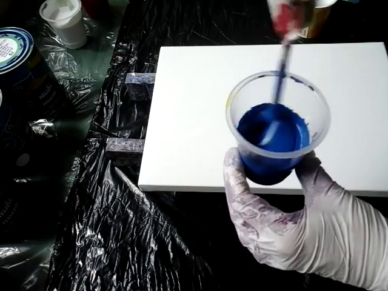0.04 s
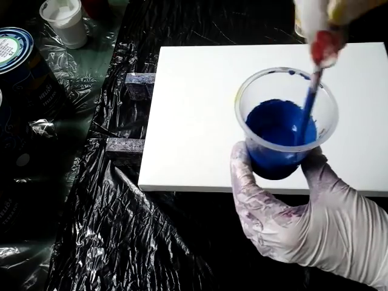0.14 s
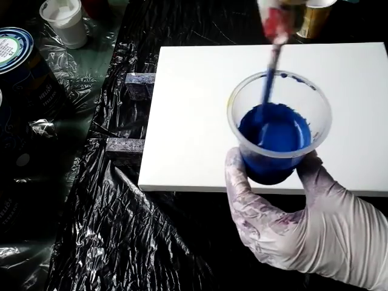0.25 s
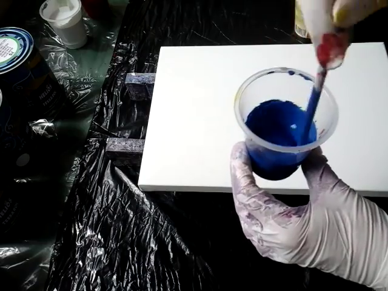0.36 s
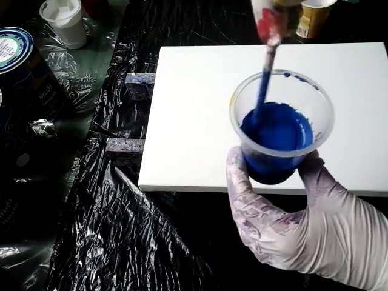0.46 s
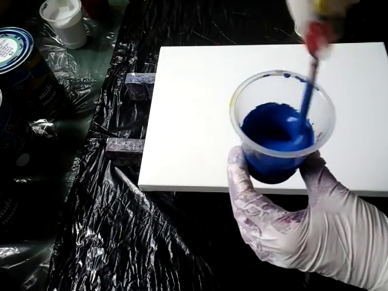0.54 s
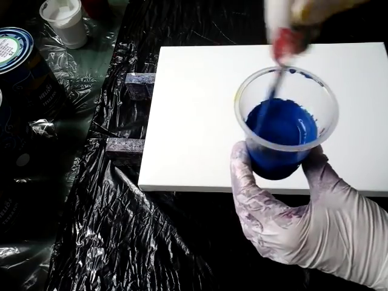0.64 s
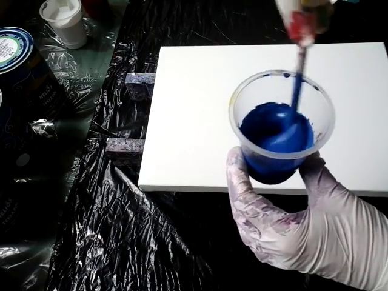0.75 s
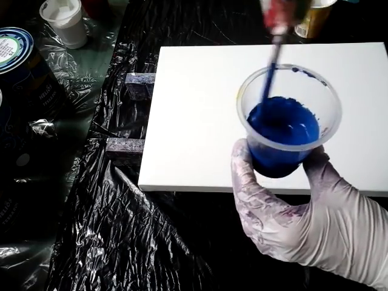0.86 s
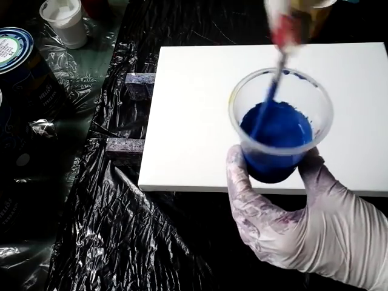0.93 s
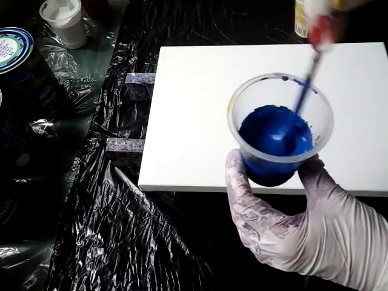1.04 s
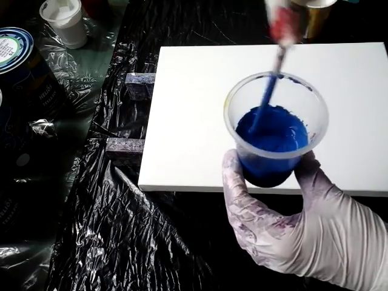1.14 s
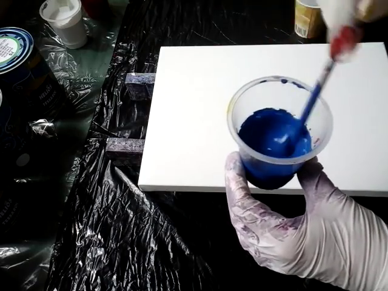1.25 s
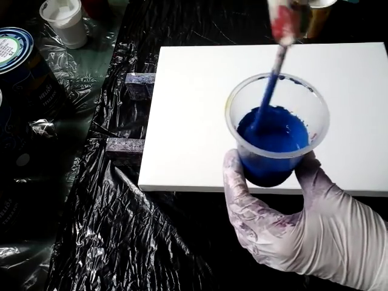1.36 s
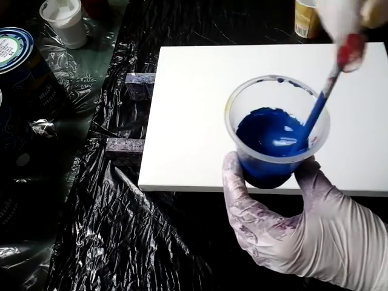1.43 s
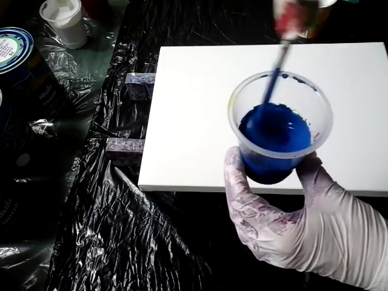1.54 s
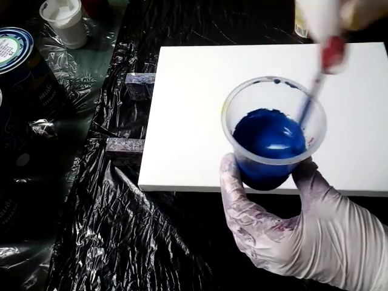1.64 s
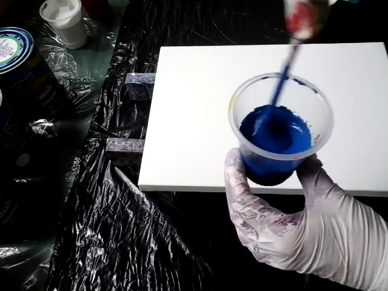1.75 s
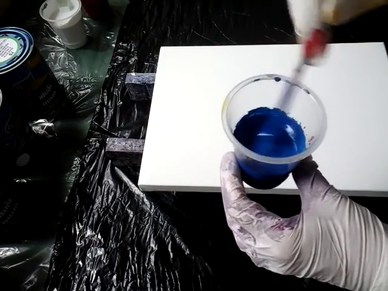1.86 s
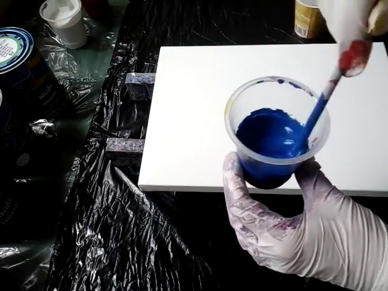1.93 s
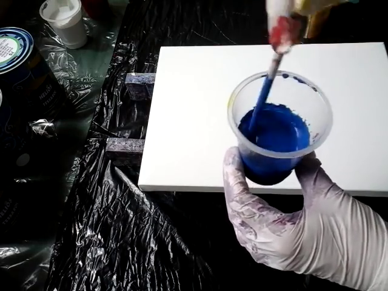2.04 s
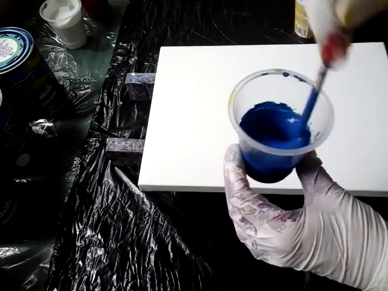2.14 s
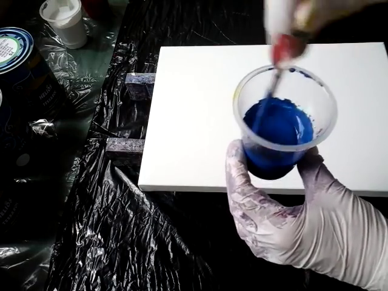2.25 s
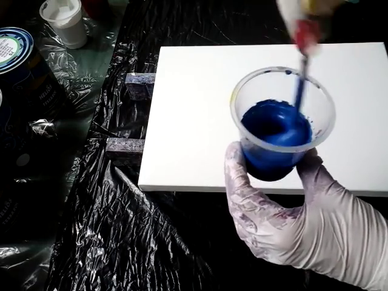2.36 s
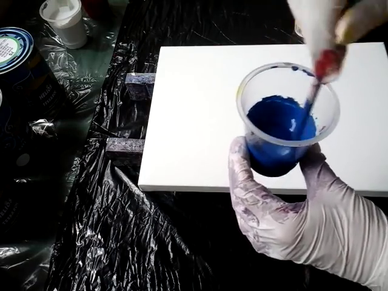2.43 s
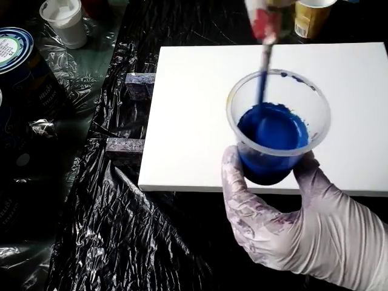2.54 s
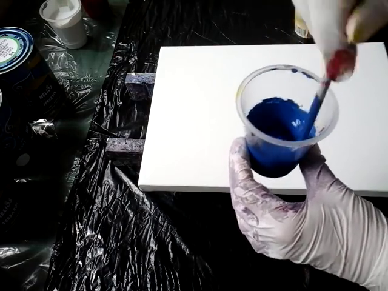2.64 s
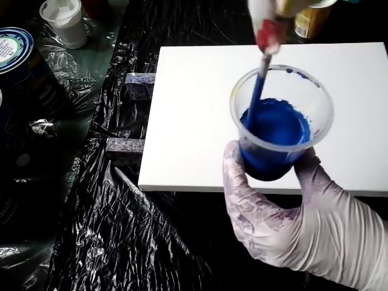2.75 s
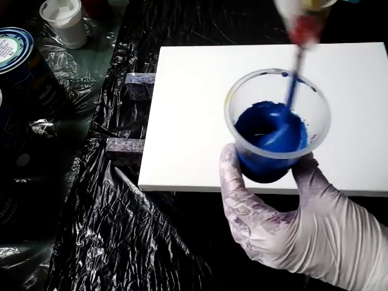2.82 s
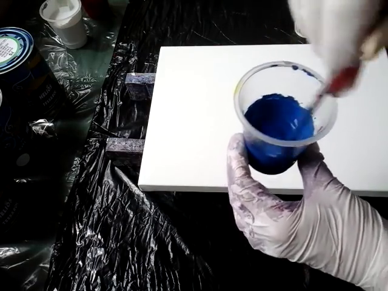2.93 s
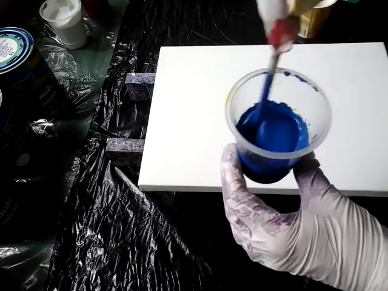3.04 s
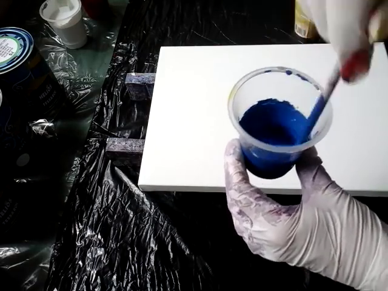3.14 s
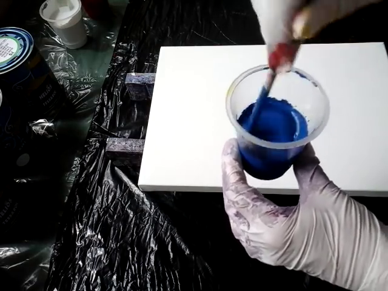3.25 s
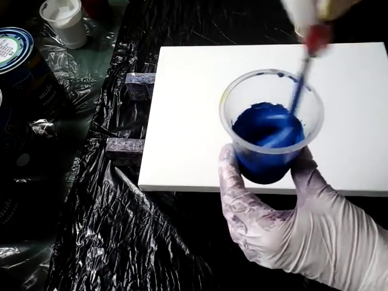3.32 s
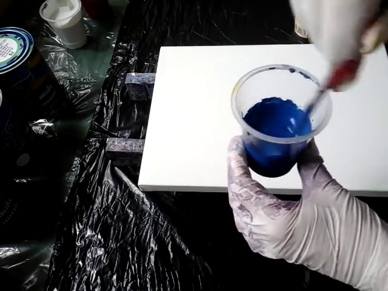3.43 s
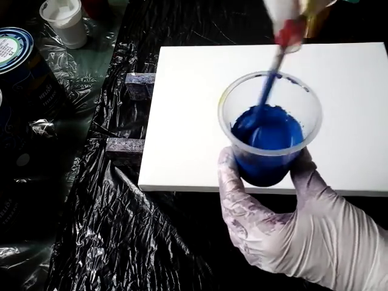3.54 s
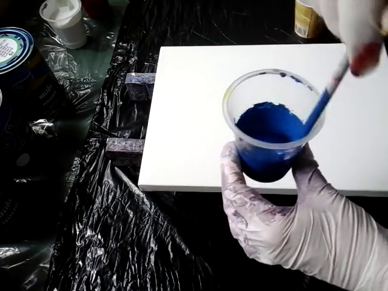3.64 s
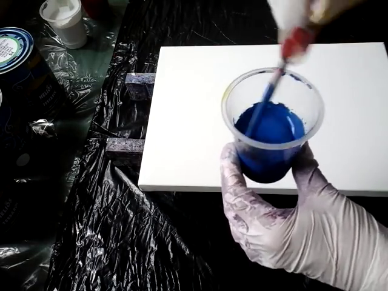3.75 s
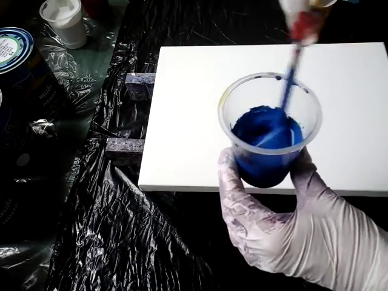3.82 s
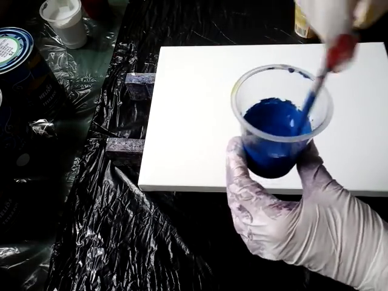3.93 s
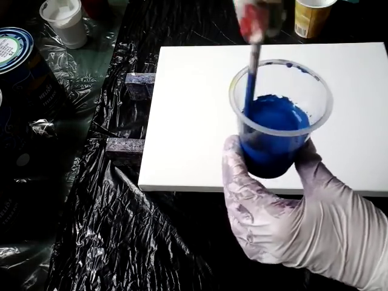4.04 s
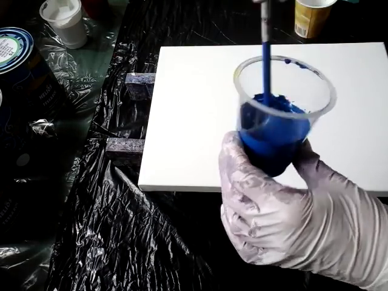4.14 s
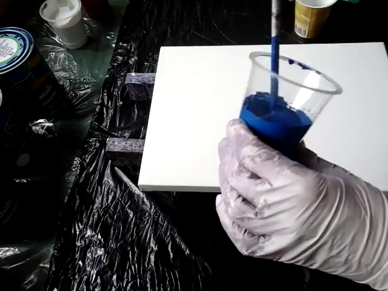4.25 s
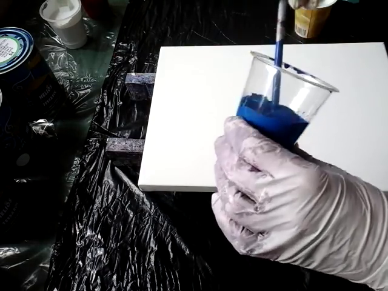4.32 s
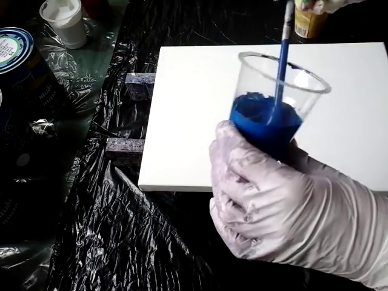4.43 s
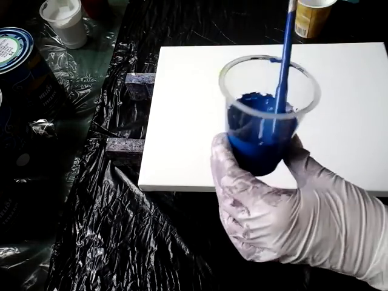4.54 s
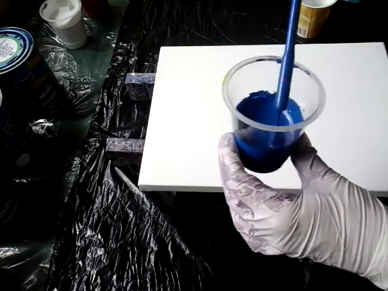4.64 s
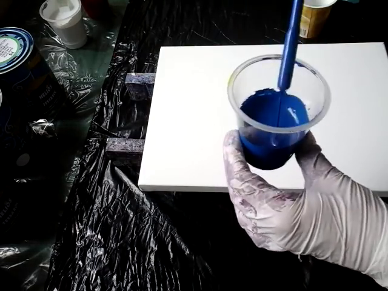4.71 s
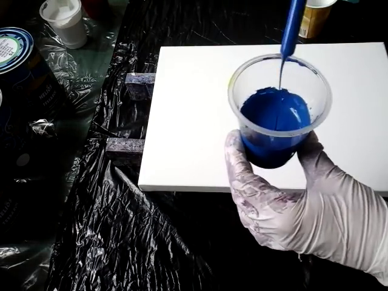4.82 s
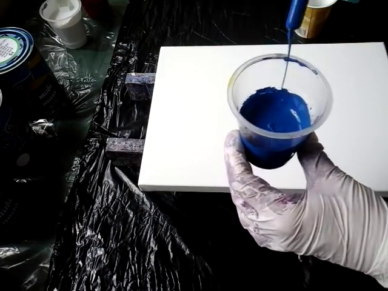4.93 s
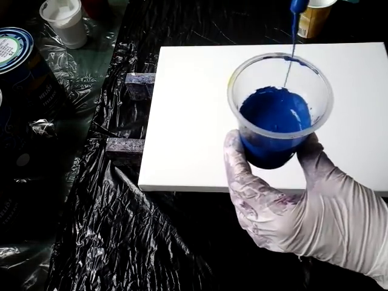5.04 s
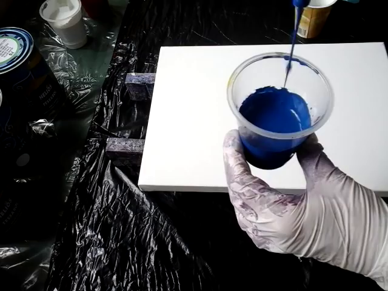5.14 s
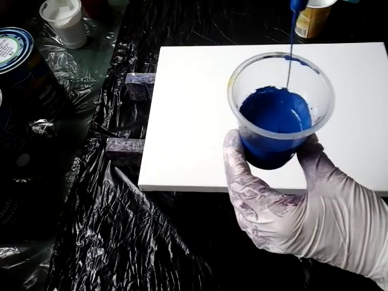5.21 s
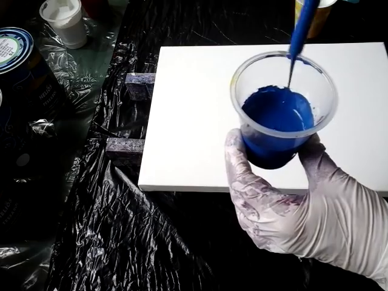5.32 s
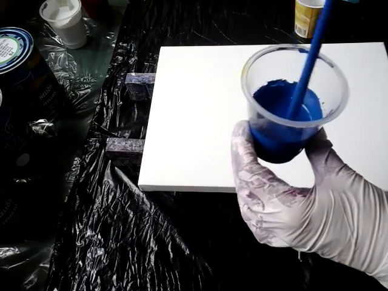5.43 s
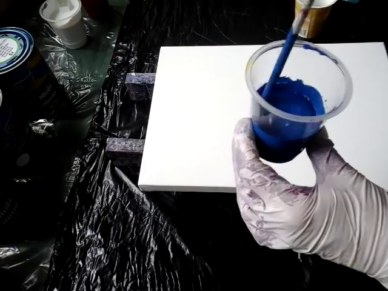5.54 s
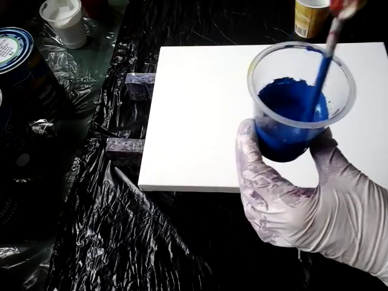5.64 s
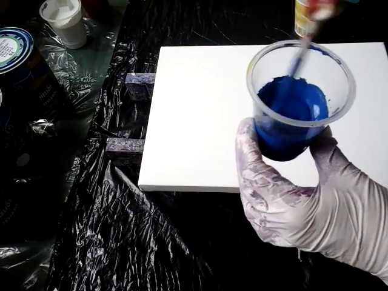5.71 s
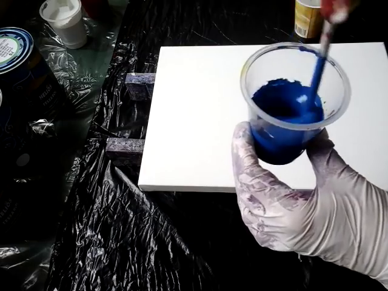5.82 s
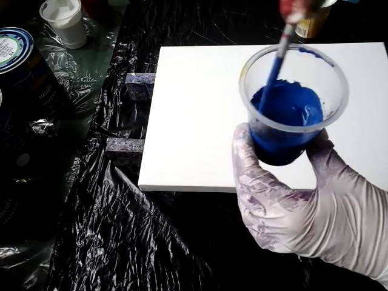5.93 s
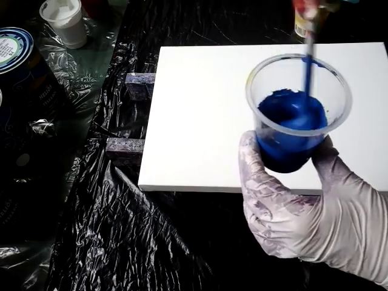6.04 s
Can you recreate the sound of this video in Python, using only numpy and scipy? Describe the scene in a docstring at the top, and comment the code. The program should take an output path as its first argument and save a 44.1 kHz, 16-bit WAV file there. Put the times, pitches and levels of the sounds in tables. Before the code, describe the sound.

A wooden stick stirs thick paint in a plastic cup, clicking and scraping irregularly, pausing near the end, then knocking hollowly as stirring resumes.

```python
"""Knocks and sharp ticks: a wooden stick stirs thick paint in a hand-held plastic cup, close to a small microphone.
Taps ring damped modes, some light ticks crisped by treble bursts; scrapes are random slips in broad resonances.
Short rubs (squeaks, swishes, stroke onsets, a click) are noise in narrow ones; a small room adds short tails.
The stirring pauses, then resumes. A faint far-off warble is noise at a swinging pitch; rumble and hiss are
shaped noise. The recorder turns quiet down, sparing most of the deepest rumble, and limits the treble."""
import sys
import numpy as np
from scipy import signal
from scipy.io import wavfile
from scipy.ndimage import uniform_filter1d

SR = 44100
rng = np.random.default_rng(int(sys.argv[2]) if len(sys.argv) > 2 else 0)


def dump_mix(stems):
    """Bounce the given channels to the path in sys.argv[1] as a 16-bit WAV at rate SR."""
    frames = np.atleast_2d(stems).T  # one column per channel
    limited = np.clip(frames, -1, 1)  # hard clip at full scale
    pcm = np.round(limited * 32767).astype(np.int16)
    wavfile.write(sys.argv[1], SR, pcm)


N = 267907


def gain_of(db):
    """Decibels to amplitude gain."""
    return 10 ** (np.asarray(db) / 20)


def evened(x):
    """Scales to rms 1."""
    return x / np.sqrt(np.mean(x ** 2) + 1e-20)


def read(points, hz):
    """Interpolates a table on a log-frequency axis."""
    f, value = np.transpose(points)
    return np.interp(np.log(hz + 1), np.log(f + 1), value)


def resonate(x, hz, pole_width_hz):
    """Movable resonance: shifts hz down to zero, smooths with two equal poles, shifts back."""
    turn = np.exp(2j * np.pi * np.cumsum(hz * np.ones(len(x))) / SR)
    r = np.exp(-np.pi * pole_width_hz / SR)
    smooth = signal.lfilter([(1 - r) ** 2], [1, -2 * r, r * r], x / turn)
    return 2 * (turn * smooth).real


def wander(corner_hz):
    """Random curve: low-passed knots of rms 1, about 40 a second, joined by straight lines."""
    knots = rng.standard_normal(int(N / SR * 40))
    smooth = evened(signal.lfilter([1], [1, -np.exp(-np.pi * corner_hz / 20)], knots))
    return np.interp(np.arange(N), np.linspace(0, N, len(smooth)), smooth)


def add(mix, start_s, sound):
    """Mixes a sound in at a time."""
    part = mix[round(start_s * SR):][:len(sound)]
    part += sound[:len(part)]


def taps():
    """Each blow is a rough contact of a millisecond or so that rings all mode families, unevenly by spot."""
    # stick against the cup: time_s, hollow_knock_peak_db, wall_ring_peak_db, sharp_tick_peak_db
    blows = [(.001, -41, -59, -67), (0.033, -46, -65, -32), (.224, -49.5, -47, -37.5),
             (.252, -35.5, -37, -39), (0.295, -67, -54, -31), (0.45, -42, -39, -34),
             (.478, -32, -33, -25.5), (.533, -58, -53, -37), (.686, -41.5, -38, -37.5),
             (0.773, -45.5, -48, -36.5), (0.839, -39.5, -33.5, -24.5), (0.904, -46.5, -45, -41),
             (.926, -39.5, -41.5, -36), (1.007, -52, -51, -33.5), (1.119, -44, -41, -27),
             (1.149, -43, -60, -65), (1.228, -39.5, -41, -41), (1.251, -37.5, -30, -18.5),
             (1.349, -54, -48, -39.5), (1.442, -34, -40, -38), (1.448, -32.5, -49, -36),
             (1.467, -30, -22.5, -9), (1.577, -49, -44.5, -38), (1.699, -41.5, -30, -16.5),
             (1.845, -40, -47, -37), (1.901, -50, -50, -60), (1.925, -35.5, -26.5, -11.5),
             (2.044, -36, -28.5, -18), (2.079, -43, -58, -37), (2.268, -60, -48, -31),
             (2.542, -38.5, -42, -55), (2.59, -55, -60, -36), (2.949, -54, -42, -54),
             (3.027, -43.5, -50, -52), (3.137, -49, -45, -52), (3.327, -73, -56, -40.5),
             (3.378, -42.5, -50, -57), (3.478, -45, -41, -32), (3.574, -76, -62, -34),
             (3.622, -48.5, -41, -51), (3.704, -51, -47, -32.5), (3.99, -46.5, -60, -36),
             (4.012, -30.5, -28, -22.5), (4.075, -43, -62, -54), (4.342, -57.5, -47, -56),
             (4.482, -45, -45, -59), (4.501, -58, -43.5, -50), (5.26, -94, -75, -33), (5.51, -46, -44, -42),
             (5.516, -20, -31, -21), (5.55, -26, -29.5, -29.5), (5.571, -47, -58, -56),
             (5.65, -33.5, -37, -44), (5.76, -41, -37.5, -33), (5.856, -56, -64, -44),
             (5.956, -40.5, -43, -48), (5.995, -35.5, -45, -36)]
    # modes of the gripped cup's thud: pitch_hz, relative_level_db, t60_s
    thud_modes = [(295, -3.5, 0.034), (371, 1, 0.03), (507, 7.5, 0.013), (657, 4, 0.0071),
                  (892, -11, 0.067)]
    # modes of the cavity, heard as the knock: pitch_hz, relative_level_db, t60_s
    cavity_modes = [(920, -25, 0.0033), (1137, 8, .03), (1262, 7, 0.063), (1464, 18, 0.02),
                    (1820, -5.5, 0.0016), (1900, -26, 0.0025)]
    # modes of the wall: pitch_hz, relative_level_db, t60_s
    wall_modes = [(2300, -12, .005), (2800, -6, .006), (3200, -4, .006), (3600, 0, .008), (4000, -3, .006),
                  (4400, -5, .005)]
    # modes of the sharp tick: pitch_hz, relative_level_db, t60_s
    tick_modes = [(4430, -53, 0.0013), (5214, -7.5, 0.0056), (5790, -6, 0.0028), (6227, -6, 0.0096),
                  (6900, 7, 0.0012), (7500, 6, 0.0035), (8000, -0.5, 0.0079), (8560, 2.5, 0.0023),
                  (9580, -5, 0.00057), (10800, -13.5, 0.0021), (14000, -14, 0.0013)]
    thud_ref_db, knock_ref_db, thud_growth = -48.5, -39.5, 0.51  # thud dB per knock dB: the hand grips the cup
    contact_fall_20db_ms, grit_level = 1.1, .22
    yield_hz = 8900  # the wall gives a little, which rounds the push
    crack_under_tick_db, crack_top_db, crack_band_hz = -18, -35.5, (900, 18000)
    onset_delay_s = 0.0019  # each tap starts this long after its table time

    out, t = np.zeros(N), np.arange(3000) / SR
    families = (thud_modes, cavity_modes, wall_modes, tick_modes)
    modes = np.array(thud_modes + cavity_modes + wall_modes + tick_modes)
    family = np.repeat(np.arange(4), [len(m) for m in families])
    hz, mode_db, t60 = modes.T[:, :, None]
    spots = rng.standard_normal((len(blows), 2 * len(modes) + 200))
    for (time_s, knock_db, wall_db, tick_db), spot in zip(blows, spots):
        start_s = time_s + onset_delay_s
        thud_db = min(thud_ref_db + thud_growth * (knock_db - knock_ref_db), knock_db - 8)
        spread, detune, grit = np.split(spot, [len(modes), 2 * len(modes)])
        spot_db = 1.5 * spread[:, None]
        spot_hz = hz * (1 + .012 * detune[:, None])
        rings = gain_of(mode_db + spot_db - 60 * t / t60) * np.sin(2 * np.pi * spot_hz * t)
        rings[1::2] *= -1  # neighbouring modes swing in opposite senses, which fills the gaps between them

        contact = grit_level * grit * gain_of(-20 * t[:200] * 1000 / contact_fall_20db_ms)
        contact[0] = 1
        push = signal.lfilter(*signal.butter(2, yield_hz, fs=SR), contact)
        for k, db in enumerate((thud_db, knock_db, wall_db, tick_db)):
            ring = signal.fftconvolve(rings[family == k].sum(0), push)[:len(t)]
            # a small object radiates little far below its lowest mode
            low_hz = 0.47 * modes[family == k, 0].min()
            ring = signal.sosfilt(signal.butter(2, low_hz, "high", fs=SR, output="sos"), ring)
            add(out, start_s, gain_of(db) * ring / abs(ring).max())

        # bare crack of the contact
        crack = signal.lfilter(*signal.butter(1, crack_band_hz, "band", fs=SR), contact)
        crack_db = min(tick_db + crack_under_tick_db, crack_top_db)
        add(out, start_s, gain_of(crack_db) * crack / abs(crack).max())
    return out


def scrape():
    """Thousands of tiny slips a second sound through the broad resonances of the damped cup."""
    # strokes along the wall: start_s, length_s, pressure_db
    strokes = [(0, 0.04, -64), (0.082, 0.085, -56.5), (0.291, 0.076, -54.5), (0.355, 0.037, -58.5),
               (0.532, 0.044, -55.5), (0.772, 0.033, -54), (0.954, .078, -67), (1.282, 0.021, -56),
               (1.675, 0.0086, -51), (1.789, .013, -54), (2.099, 0.08, -62), (2.257, 0.1, -60.5),
               (2.363, 0.051, -57), (2.514, 0.059, -58), (2.571, 0.099, -60.5), (2.666, 0.04, -68),
               (2.729, 0.029, -48.5), (2.83, 0.049, -56.5), (2.906, 0.099, -67), (3.098, .03, -54),
               (3.334, 0.04, -57.5), (3.456, 0.06, -55.5), (3.573, 0.079, -58), (3.689, 0.046, -54),
               (3.736, 0.059, -54), (3.828, 0.07, -60), (3.891, 0.25, -62.5), (4.122, 0.021, -58),
               (4.451, 0.057, -62.5), (4.479, 0.021, -52.5), (5.524, 0.066, -52.5), (5.588, 0.034, -50),
               (5.622, 0.076, -51.5), (5.847, .076, -56.5), (5.975, 0.1, -65)]
    # light drag, also between strokes: time_s, pressure_db
    drag = [(0, -61), (.6, -58.5), (1.1, -69), (1.6, -60.5), (2.2, -66.5), (2.4, -59.5), (3.2, -56),
            (4.1, -60), (4.3, -64), (4.62, -66), (5.24, -97), (5.3, -78), (5.4, -68), (5.5, -65.5),
            (5.56, -72), (5.75, -65.5), (6.07, -62.5)]
    # colour of the scrape: time_s, cavity_level_against_rasp_db, wall_resonance_hz
    colour = [(0, -1.5, 3350), (.12, -13, 3400), (.75, -15, 2960), (1.1, -5.5, 3560), (2.1, -9, 3460),
              (2.4, -10, 2850), (2.74, -11, 3260), (3.1, -11.5, 2900), (3.6, -10.5, 3380), (4.0, -11, 3420),
              (4.5, -4, 3470), (5.53, -6, 3600), (5.66, -10.5, 4100), (5.87, -10, 3150), (6.05, -12, 3040)]
    # wet body that swells with the cavity: pitch_hz, pole_width_hz, level_against_cavity_db
    wet_body = [(500, 350, -9), (916, 700, -13), (2080, 1700, -8)]
    # fixed resonances: pitch_hz, pole_width_hz, level_against_rasp_db
    fixed_rub = [(4400, 1400, -11), (5800, 1500, -6), (9300, 2500, -9), (12500, 6000, -14)]
    slips_per_s, slip_spread_db = 5000, 3.5
    stroke_rise_s = 0.0054
    cavity_hz, rasp_hz, rasp_drift_hz = 1444, 7560, 220
    flicker_db = 2.2

    t = np.arange(N) / SR
    size = gain_of(slip_spread_db * np.minimum(rng.exponential(1, N), 5))
    size *= rng.choice([-1., 1.], N)
    slips = size * (rng.random(N) < slips_per_s / SR)

    pressure = gain_of(np.interp(t, *np.transpose(drag)))
    for start_s, length_s, level_db in strokes:
        # the stick bites quickly, eases off, and leaves the wall
        u = t[:round(length_s * SR)]
        bite = (1 - np.exp(-u / stroke_rise_s)) * np.sqrt(1 - (u / length_s) ** 2)
        add(pressure, start_s, gain_of(level_db) * bite)

    time_s, cavity_points_db, wall_points_hz = np.transpose(colour)
    cavity_db = np.interp(t, time_s, cavity_points_db)
    wall_hz = np.interp(t, time_s, wall_points_hz)
    resonances = [(cavity_hz, 600, cavity_db),
                  (wall_hz, 520, -11),
                  (rasp_hz + rasp_drift_hz * wander(8), 1300, 0)]
    resonances += [(hz, width, db + cavity_db) for hz, width, db in wet_body]
    resonances += fixed_rub
    rub = np.zeros(N)
    for k, (hz, width, db) in enumerate(resonances):
        # each resonance is driven from its own patch of wall, which slips at its own moments
        patch = np.roll(slips, 5003 * k)
        rub += gain_of(db + flicker_db * wander(25)) * evened(resonate(patch, hz, width))
    return pressure * rub


def narrow_rubs():
    """Short narrow-band rubs: squeaks, swishes, stroke onsets and a click, as noise in one narrow resonance."""
    # short narrow-band rubs: start_s, length_s, centre_hz, level_before_fades_db
    rub_table = [(0.083, 0.022, 7700, -47.5), (0.29, .035, 7600, -43.5), (0.371, .018, 8900, -47.5),
                 (0.533, 0.017, 7500, -46), (0.691, 0.023, 3200, -61), (0.691, 0.046, 1610, -60.5),
                 (.78, 0.022, 2980, -61), (2.289, 0.06, 3050, -63.5), (2.687, 0.016, 7500, -47),
                 (2.729, 0.025, 3340, -51.5), (2.733, 0.028, 1560, -51.5), (2.85, 0.1, 2950, -62),
                 (2.957, 0.022, 5300, -56), (2.97, 0.094, 3300, -64.5), (3.103, 0.031, 2800, -55),
                 (3.321, 0.026, 5440, -56), (3.485, .03, 3150, -57.5), (3.765, 0.026, 3260, -58),
                 (3.814, 0.041, 5030, -54), (4.13, 0.047, 5300, -56), (4.466, .045, 1890, -56.5),
                 (4.47, 0.025, 3020, -65), (5.595, 0.014, 5300, -49), (5.652, 0.0036, 4600, -42),
                 (5.983, 0.026, 2950, -53.5)]
    pole_q = 7
    out = np.zeros(N)
    noises = rng.laplace(size=(len(rub_table), SR // 10))
    for (start_s, length_s, hz, db), noise in zip(rub_table, noises):
        burst = evened(resonate(noise[:round(length_s * SR)], hz, hz / pole_q))
        add(out, start_s, gain_of(db) * burst * signal.windows.tukey(len(burst), .6))
    return out


def treble_bursts():
    """Very short bursts of high-passed noise, some on top of a tap, that give light ticks a crisp top."""
    # very short treble bursts: start_s, peak_db
    burst_table = [(0.8418, -24.5), (1.1205, -55), (1.68, -48), (2.263, -27), (2.461, -29.5), (4.025, -28),
                   (5.627, -37), (5.981, -42)]
    low_hz, t60_s = 7000, 0.0074
    out, t = np.zeros(N), np.arange(300) / SR
    edge = signal.butter(2, low_hz, "high", fs=SR, output="sos")
    noises = rng.standard_normal((len(burst_table), len(t)))
    for (start_s, db), noise in zip(burst_table, noises):
        burst = signal.sosfilt(edge, noise * gain_of(-60 * t / t60_s))
        add(out, start_s, gain_of(db) * burst / abs(burst).max())
    return out


def room(x):
    """Three tails of sparse echoes, fed in turn, each band dying at its own speed."""
    # decay of the small room: band_hz, t60_s
    decay = [(300, 0.78), (1400, 0.35), (4500, 0.34), (8000, 0.26), (13000, 0.15)]
    feed_turn_hz, gap, spacing = 1.6, 130, 20  # gap before the first echo and echo spacing in samples
    out, turn = np.zeros(N), 2 * np.pi * feed_turn_hz * np.arange(N) / SR
    for k in range(3):
        tail = np.zeros(SR // 2)
        at = np.arange(gap, len(tail) - spacing, spacing)
        tail[at + rng.integers(0, spacing, len(at))] = rng.choice([-1., 1.], len(at))
        hz, t, z = signal.stft(tail, SR, nperseg=128)
        fade = gain_of(-60 * t / read(decay, hz)[:, None])
        tail = signal.istft(z * fade, SR, nperseg=128)[1]
        tail[:gap] = 0
        feed = np.sqrt(2 / 3) * np.cos(turn + 2 * np.pi * k / 3)
        out += signal.fftconvolve(x * feed, tail / np.linalg.norm(tail))[:N]
    return out


def warble():
    """Narrow noise notes whose pitch swings quickly; plain in the pause, drawn at random behind the stirring."""
    # distant notes, each held until the next, mostly high and low in turn: start_s, centre_hz
    note_table = [(4.24, 6160), (4.29, 5600), (4.34, 7130), (4.44, 5000), (4.475, 6900), (4.535, 6160),
                  (4.615, 6900), (4.682, 5560), (4.72, 6800), (4.818, 5640), (4.849, 6900), (4.955, 5770),
                  (5.0, 6900), (5.028, 5900), (5.068, 6850), (5.101, 6140), (5.145, 7200), (5.225, 6060),
                  (5.285, 6900), (5.335, 5630), (5.397, 6700), (5.42, 5140), (5.455, 6900)]
    last_end_s, blur_s = 5.515, 0.013
    plain_db, behind_db = -62, -65  # before fades
    pole_width_hz, trill_hz, swing_depth_hz = 750, 45, 430

    before_s = np.arange(0, note_table[0][0] - .06, .055)
    after_s = np.arange(5.52, N / SR - .1, .055)
    starts = np.r_[before_s, after_s]
    draws = rng.random((len(starts), 2))
    behind = [(s, 0.027 + 0.089 * a, 5000 + 2400 * b, behind_db) for s, (a, b) in zip(starts, draws)]
    ends = [s for s, hz in note_table[1:]] + [last_end_s]
    plain = [(s, end - s + blur_s, hz, plain_db) for (s, hz), end in zip(note_table, ends)]

    t, out, air = np.arange(N) / SR, np.zeros(N), rng.standard_normal(N)
    swing_hz = swing_depth_hz * np.sin(2 * np.pi * trill_hz * t + 2.16 * wander(23))
    for start_s, length_s, hz, db in plain + behind:
        at = slice(round(start_s * SR), round((start_s + length_s + 0.0017) * SR))
        note = evened(resonate(air[at], hz + swing_hz[at], pole_width_hz))
        out[at] += gain_of(db) * note * signal.windows.tukey(len(note), .3)
    return out


def hiss():
    """Shaped noise: room rumble that comes in lumps, and microphone hiss with faint patches."""
    # spectrum of rumble and hiss: frequency_hz, relative_density_db
    spectrum = [(15, -66), (33, -30), (54, -3), (70, -5.5), (120, -5.5), (300, -11.5), (650, -19.5),
                (2000, -24.5), (4000, -23), (10000, -25), (17000, -23.5)]
    rms_db, patchy_db, lumpy_db, lump_corner_hz = -60, 1.3, 2.5, 150
    frames, hz = N // 256 + 5, np.fft.rfftfreq(1024, 1 / SR)
    a, b, patches = rng.standard_normal((frames, 513, 3)).T
    patches = evened(uniform_filter1d(uniform_filter1d(patches, 12, 0), 10, 1))
    frame_at = np.minimum(np.arange(frames) * 256, N - 1)
    lumps = wander(1.5)[frame_at] / (1 + (hz[:, None] / lump_corner_hz) ** 2)
    level_db = read(spectrum, hz)[:, None] + patchy_db * patches + lumpy_db * lumps
    noise = signal.istft((a + 1j * b) * gain_of(level_db), nperseg=1024, noverlap=768)[1][:N]
    return gain_of(rms_db) * evened(noise)


def scene():
    """Sums the cup, its room, and the background."""
    room_db = -8.5
    cup = taps() + scrape() + narrow_rubs() + treble_bursts()
    return (cup + gain_of(room_db) * room(cup) + warble() + hiss())[None]


def record(dry):
    """A suppressor opens fast on sound above the rumble and closes slowly in quiet; then the band limit."""
    # recorder roll-off: frequency_hz, gain_db
    roll_off = [(16500, 0), (17050, -1), (17350, -20), (18400, -24)]
    threshold_db, cut_slope, max_cut_db, release_db_per_s = -51.0, 1.45, 11.5, 86.3
    sense_low_hz, spared_hz, spared_share, edge_hz = 900, 75, .15, 18500

    sensed = signal.sosfilt(signal.butter(2, sense_low_hz, "high", fs=SR, output="sos"), dry[0])
    power_db = 10 * np.log10(abs(uniform_filter1d(sensed ** 2, 600)) + 1e-12)
    fall_db = np.arange(N) * release_db_per_s / SR
    held_db = np.maximum.accumulate(power_db + fall_db) - fall_db
    cut_db = uniform_filter1d(np.clip(cut_slope * (threshold_db - held_db), 0, max_cut_db), 200)

    low = signal.sosfiltfilt(signal.butter(1, spared_hz, fs=SR, output="sos"), dry)
    # the deepest rumble is mostly spared
    quieted = low * gain_of(-spared_share * cut_db) + (dry - low) * gain_of(-cut_db)

    grid_hz = np.linspace(0, SR / 2, 257)
    roll_filter = signal.firwin2(255, grid_hz, gain_of(read(roll_off, grid_hz)), fs=SR)
    rolled = signal.oaconvolve(quieted, roll_filter[None], "same")
    edge_filter = signal.firwin(511, edge_hz, window=("kaiser", 9), fs=SR)
    return signal.oaconvolve(rolled, edge_filter[None], "same")


dry = scene()
out = record(dry)
dump_mix(out)
```